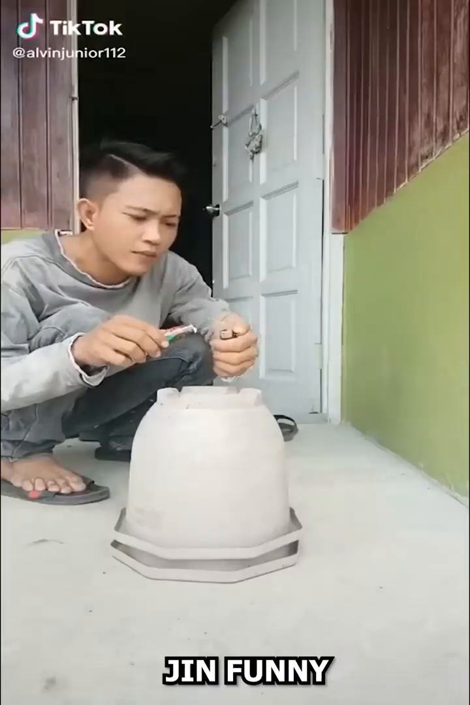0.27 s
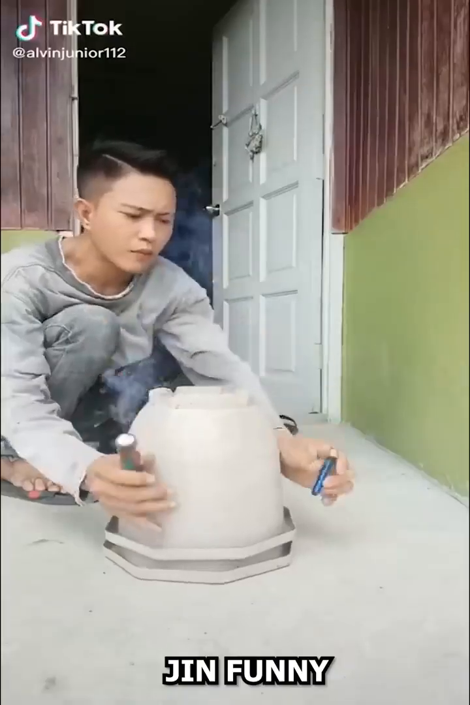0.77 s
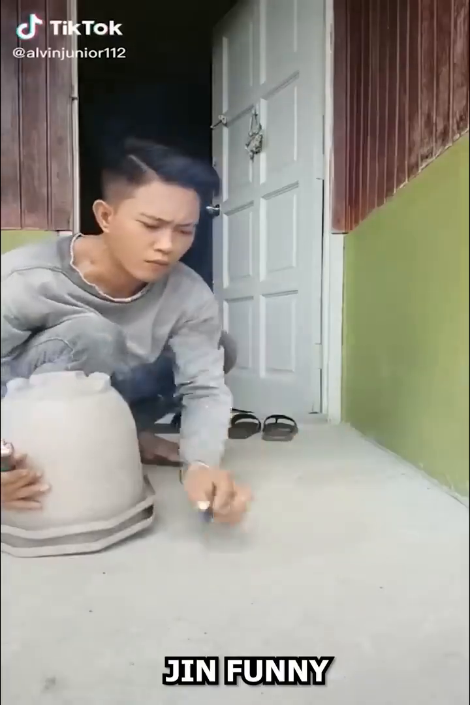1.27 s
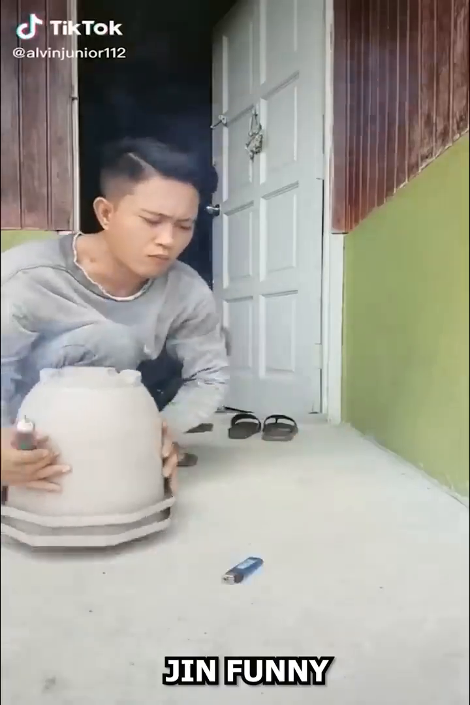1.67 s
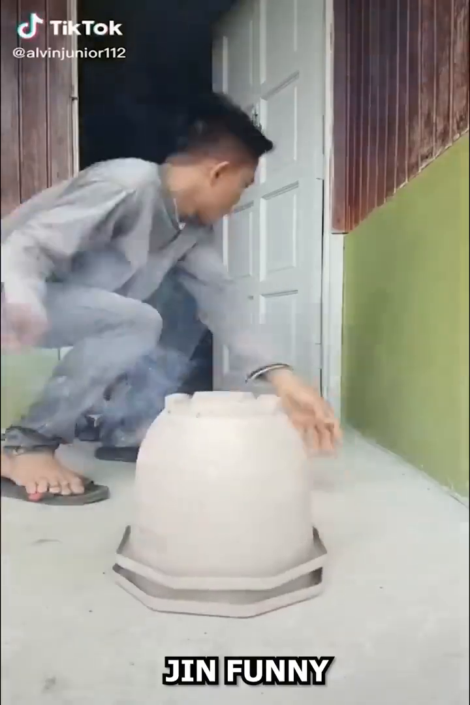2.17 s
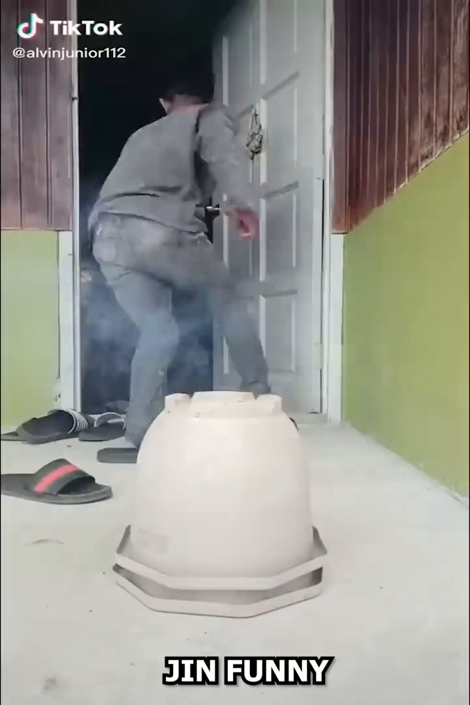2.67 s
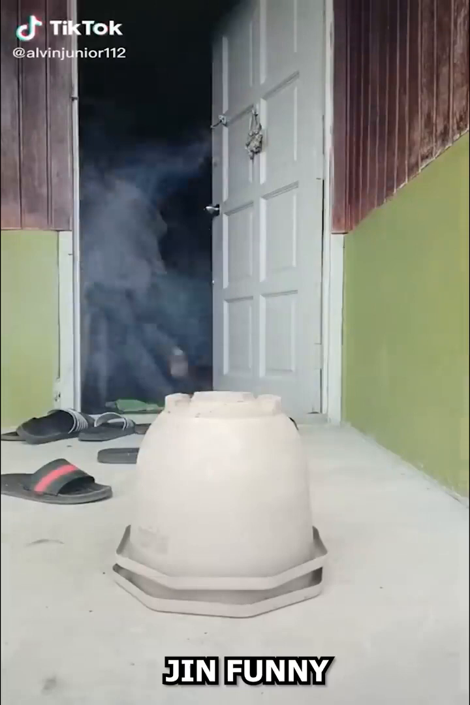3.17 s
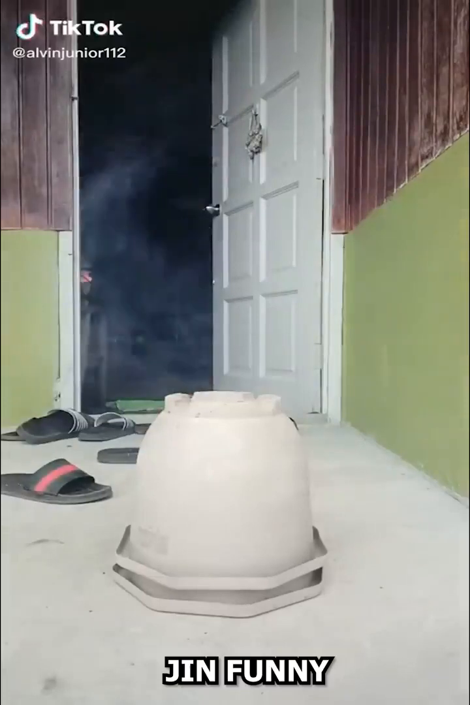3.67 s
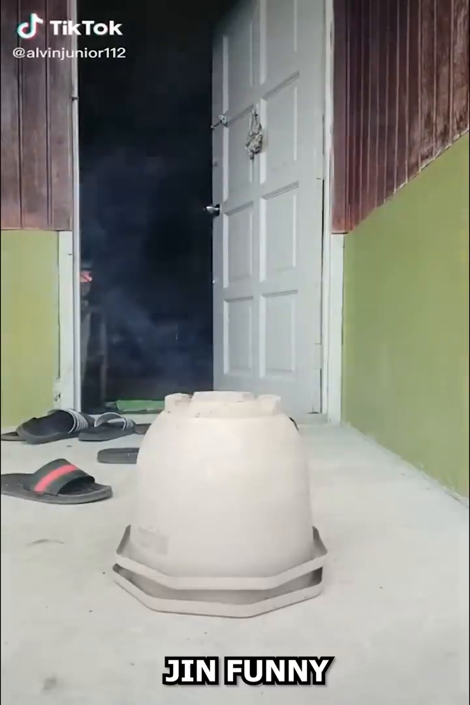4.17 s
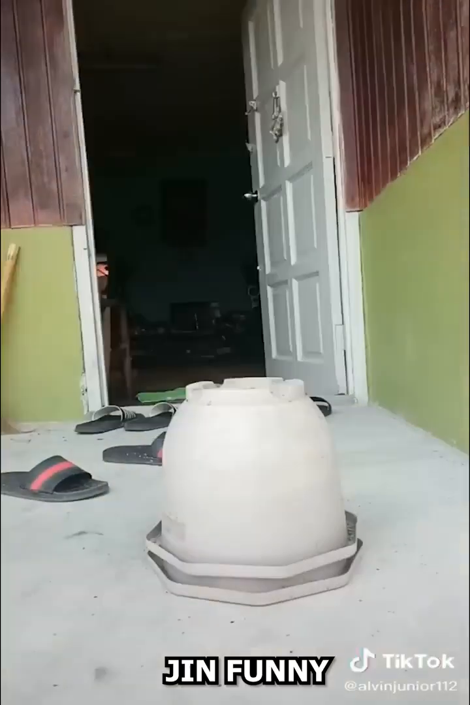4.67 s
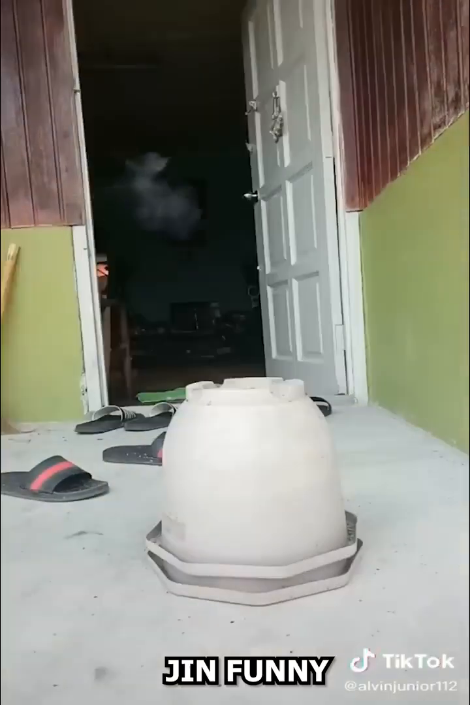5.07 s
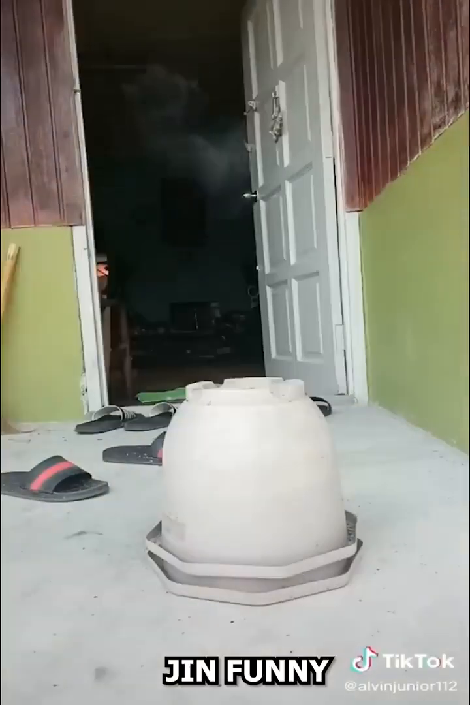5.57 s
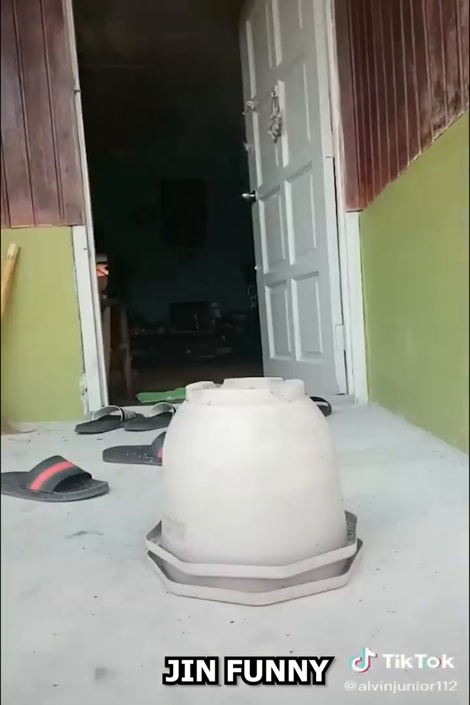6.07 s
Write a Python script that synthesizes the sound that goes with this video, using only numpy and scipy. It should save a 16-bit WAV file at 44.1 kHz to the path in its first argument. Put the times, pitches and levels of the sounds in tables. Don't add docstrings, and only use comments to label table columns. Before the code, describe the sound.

A lighter snaps, far dog barks, a hollow pot clatters onto concrete; after a hush a deafening firecracker blast rolls on, growing duller.

```python
import sys
import numpy as np
from scipy import signal
from scipy.io import wavfile
from scipy.ndimage import uniform_filter1d, minimum_filter1d

SR = 44100
rng = np.random.default_rng(int(sys.argv[2]) if len(sys.argv) > 2 else 0)


def generate_wav(signal):
    frames = np.transpose(np.atleast_2d(signal))
    scaled = np.clip(frames, -1, 1) * 32767
    pcm = np.round(scaled).astype(np.int16)
    wavfile.write(sys.argv[1], SR, pcm)


def field_ratio(decibels):
    return 10 ** (np.asarray(decibels, dtype=float) / 20)


N = 279591
TIME = np.arange(N) / SR
HZ = np.fft.rfftfreq(512, 1 / SR)[:, None]
FRAME_S = np.arange(N // 128 + 5) * 128 / SR

BANG_S = 4.699


def evened(x):
    return x / np.sqrt(np.mean(x ** 2) + 1e-20)


def spectrum(points, hz):
    f, level_db = np.transpose(points)
    return np.interp(np.log(hz + 1), np.log(f + 1), level_db)


def curve(rows, t=TIME):
    s, value = np.transpose(rows)
    return np.interp(t, s, value)


def bump(hz, octaves):
    return np.exp(-(np.log2((HZ + 1) / hz) / octaves) ** 2)


def burst(s, db, rise_db_per_s, fall_db_per_s, hold_s=0.):
    before_db = (s - TIME) * rise_db_per_s
    after_db = np.maximum(TIME - s - hold_s, 0) * fall_db_per_s
    return field_ratio(db - np.maximum(before_db, after_db))


def slow(rate_hz):
    low_pass = signal.butter(2, rate_hz, fs=SR, output="sos")
    return evened(signal.sosfilt(low_pass, rng.standard_normal(N)))


def noise(shape_db, patchy_db, flicker_db):
    a, b, patches = rng.standard_normal((len(FRAME_S), len(HZ), 3)).T
    flicker = evened(uniform_filter1d(rng.standard_normal(len(FRAME_S)), size=3))
    patches = uniform_filter1d(patches, size=5, axis=0)
    patches = evened(uniform_filter1d(patches, size=16, axis=1))
    gain = field_ratio(shape_db + 0 * a)
    gain = gain / np.sqrt((gain ** 2).sum(0))
    z = (a + 1j * b) * gain * field_ratio(patchy_db * patches + flicker_db * flicker)
    return evened(signal.istft(z, nperseg=512, noverlap=384)[1][:N])


def resonate(x, hz, width_hz):
    turn = np.exp(2j * np.pi * np.cumsum(hz * np.ones(len(x))) / SR)
    r = np.exp(-np.pi * width_hz / SR)
    for _ in range(2):
        x = 2 * (turn * signal.lfilter([1 - r], [1, -r], x / turn)).real
    return x


def ring(modes, rise_s=0.):
    t = TIME[:SR // 2]
    rise = 1 - np.exp(-t / (rise_s + 1e-9))
    return rise * sum(field_ratio(db - 60 * t / t60) * np.sin(2 * np.pi * hz * t) for hz, db, t60 in modes)


def placed(s, sound):
    return np.pad(sound, (round(s * SR), N))[:N]


def yard(x, t60, wet_db):
    t = TIME[:SR // 2]
    scattered = rng.standard_normal(len(t)) * (rng.random(len(t)) < .05)
    tail = scattered * field_ratio(-60 * t / t60) * (t > .02)
    return x + field_ratio(wet_db) * signal.oaconvolve(x, tail / np.linalg.norm(tail))[:N]


def high_pass(x, hz):
    return signal.sosfilt(signal.butter(3, hz, "high", fs=SR, output="sos"), x)


def phone():
    shelf_db = -5.5 * (HZ > 6300)
    notch_db = -3.5 * np.exp(-((HZ - 12200) / 300) ** 2)
    return shelf_db + notch_db


def holes(share):
    cells = rng.random((len(FRAME_S) // 16 + 1, len(HZ))).T
    cells = np.repeat(cells, 16, 1)[:, :len(FRAME_S)]
    return -30 * (cells < share * np.clip((HZ - 2000) / 4000, 0, 1))


def air():
    # f/Hz, level/dB per Hz
    porch = [(65, -43.5), (110, 1), (200, -17), (636, -23), (885, -21), (1110, -24.5), (1940, -25.5),
             (3750, -15), (5220, -24.5), (6160, -23.5), (7270, -30), (13000, -29), (15300, -35)]
    # t/s, level/dB
    opening = [(0.0, -54.5), (0.4, -54), (1.2, -52), (1.8, -52), (2.25, -54), (2.67, -52.5), (2.84, -57.5),
               (3.3, -59), (3.7, -57.5), (4.2, -56), (4.42, -58)]
    # f/Hz, width/Hz, level/dB
    insects = [(3350, 270, 5), (3643, 400, 12.5), (4200, 215, -7)]
    # t/s, level/dB
    swell = [(0.0, -50), (0.32, -50), (0.71, -66), (1.12, -41), (1.79, -47), (2.67, -47.5), (2.84, -50),
             (3.2, -50), (3.4, -73), (3.58, -46), (3.82, -47.5), (4.13, -53), (4.3, -51), (4.42, -67)]
    treble_db = 1.04 * (curve(opening, FRAME_S) + 53.5) * bump(5800, .4)
    colour = spectrum(porch, HZ) + phone() + treble_db + holes(0.051)
    hiss = noise(colour, patchy_db=1.5, flicker_db=.5)
    rasp = noise(0 * HZ, patchy_db=-0.5, flicker_db=2.0)
    chorus = sum(field_ratio(db) * resonate(rasp, hz, width) for hz, width, db in insects)
    return field_ratio(curve(opening) + 8.5) * hiss + field_ratio(curve(swell) - 4.0) * evened(chorus)


def engine():
    # t/s, level/dB
    throttle = [(0.0, -54), (0.08, -62), (0.64, -55), (1.04, -37.5), (1.25, -37.5), (1.32, -30.5),
                (1.79, -31), (2.08, -45.5), (2.18, -39), (2.34, -41.5), (2.56, -36), (2.8, -45.5),
                (3.3, -51.5), (3.69, -34.5), (3.82, -38), (4.05, -50.5), (4.12, -49), (4.4, -57)]
    # multiple of firing rate, level/dB
    firing_orders = [(2, -8), (3, 0.5), (4, -11), (5, -37), (6, -28.5), (7, -44), (8, -21)]
    firing_hz = 24.4
    turns = np.cumsum(firing_hz * (1 + .004 * slow(rate_hz=3))) / SR
    orders = sum(field_ratio(db + 1.4 * slow(rate_hz=3.7)) * np.cos(2 * np.pi * k * turns)
                 for k, db in firing_orders)
    rumble = evened(resonate(rng.standard_normal(N), 80, 70))
    return field_ratio(curve(throttle)) * (evened(orders) + .3 * rumble)


def cock():
    # t/s, length/s, f/Hz, level/dB
    crows = [
        (0.0, 0.2, 767, -58),
        (0.693, .095, 618, -58.5),
        (0.802, .095, 592, -58),
        (.92, 0.063, 580, -57.5),
    ]
    sag_hz_per_s, fade_db_per_s = 48, 24
    waver = np.sin(2 * np.pi * 17 * TIME)
    out = np.zeros(N)
    for s, length, hz, db in crows:
        u = np.clip(TIME - s, 0, length)
        phase = 2 * np.pi * np.cumsum(hz - sag_hz_per_s * u + 12 * waver) / SR
        on = uniform_filter1d(1. * (u > 0) * (u < length), size=900)
        voice = np.sin(phase) + field_ratio(-11) * np.sin(2 * phase)
        out += on * field_ratio(db + 7 - fade_db_per_s * u + 1.5 * waver) * voice
    return out


def lighter():
    # f/Hz, level/dB per Hz
    flick = [(59, -41), (100, -16), (275, -26), (708, -25), (803, -25), (1080, -21), (1200, -22.5),
             (2500, -22), (3730, -2), (4700, -14), (6050, -13.5), (6730, -20), (15300, -29.5)]
    # f/Hz, level/dB, t60/s
    snap = [(3650, -3, .008), (3200, -9, .008), (6000, -15, .008), (420, -28, .045), (260, -31, .08)]
    snap_s = .3683
    hiss = noise(spectrum(flick, HZ) + phone(), patchy_db=1.2, flicker_db=1.5)
    spark = burst(snap_s, -20, rise_db_per_s=1500, fall_db_per_s=2200)
    gas = burst(snap_s + .014, -27, rise_db_per_s=450, fall_db_per_s=190)
    return (spark + gas) * hiss + placed(snap_s, ring(snap, rise_s=0.00058))


def dog():
    # t/s, effort/dB, widest mouth as a factor on the throat
    barks = [
        (1.30, -36.5, 1.17),
        (1.75, -35, 1.09),
    ]
    # f/Hz, width/Hz, level/dB
    throat_modes = [(840, 560, 6.5), (1300, 860, -15), (2300, 650, -28), (400, 230, -9)]
    rise_s, hold_s, fall_s, gape_s = 0.028, 0.068, 0.035, .063
    low_hz, top_hz, end_hz = 341.5, 489, 398.3
    shut, relax = 0.54, 0.24
    length = rise_s + hold_s + fall_s
    out = np.zeros(N)
    for s, effort_db, gape in barks:
        u = TIME - s
        db = np.interp(u, [0, rise_s, length - fall_s, length], [-12, 0, -3.5, -33])
        opening = np.clip(u / gape_s, 0, 1) ** 1.5
        hz = low_hz + (top_hz - low_hz) * opening
        hz = end_hz + (hz - end_hz) * np.exp(-np.maximum(u - gape_s, 0) / 0.027)
        mouth = shut + (gape - shut) * opening
        mouth = mouth * (1 - relax * np.clip((u - gape_s) / .035, 0, 1))
        turns = np.cumsum(hz * (1 + .04 * slow(rate_hz=120))) / SR
        folds = sum(np.cos(2 * np.pi * k * turns) for k in range(1, 9))
        breath = (0.44 + np.exp(-(turns % 1) / .3)) * rng.standard_normal(N)
        drive = .36 * evened(folds) + .8 * evened(breath)
        throat = sum(field_ratio(level) * resonate(drive, f * mouth, width) for f, width, level in throat_modes)
        out += (u >= 0) * (u < length) * field_ratio(effort_db + db) * evened(throat)
    return yard(out, t60=.7, wet_db=-3)


def pot():
    # t/s, low wall level/dB, high wall level/dB, slap level/dB, pitch factor as the grip stiffens the wall
    knocks = [(2.870, -7, -3, -11.5, 1.09), (2.884, -10, -13.5, -35, 1.09), (2.906, -3, 3, -25, 1.05),
              (2.92, -9, -19, -28, 1.01), (2.935, -4.5, -16, -32, 1.01), (2.946, -9.5, -23, -38, 1.3),
              (2.998, -15, -29, -45, .98), (3.019, -15.5, -30, -48, .98), (3.052, -10.5, -18, -28, .99),
              (3.061, 4.5, -21, -29, .98), (3.087, -16, -17.5, -45, 0.92), (3.123, -27, -25, -39, .96),
              (3.157, -26, -32, -46, 1.3)]
    # f/Hz, level/dB, t60/s
    low_wall = [(201.4, -2, 0.1), (194.4, -18, 0.58)]
    high_wall = [(349, -3, 0.08), (324, -4.5, 0.13), (417, -4, 0.048)]
    slap = [(654, 8.5, 0.016), (970, -8, 0.038), (1380, -30, .04)]
    # t/s, peak level/dB, f/Hz
    ticks = [(2.8643, -26.5, 2650), (2.8623, -17.5, 2150), (2.8696, -16, 1830), (2.898, -24, 1950),
             (2.9052, -16, 1520), (2.9346, -40, 3560), (2.991, -25, 2030), (3.004, -23.5, 2400),
             (3.0184, -23, 2040), (3.0517, -23.5, 2340), (3.1072, -25.5, 1900), (3.1203, -19, 2030)]
    # t/s, peak level/dB, fade/dB per s
    skids = [(2.865, -31, 900), (2.874, -18, 1500), (2.935, -25.5, 301), (3.008, -34.5, 121),
             (3.054, -22.5, 452), (3.123, -31, 240)]
    # f/Hz, level/dB per Hz
    scrape = [(350, -38), (600, -4.5), (1280, -2.5), (1490, -11), (1980, 0), (3640, -1.5), (5530, -14),
              (6780, -21.5), (15300, -30)]
    # t/s, level/dB, f/Hz, t60/s
    landings = [
        (3.056, -36, 89, .1),
        (3.123, -18, 99, 0.11),
        (3.157, -26, 70, 0.1),
    ]
    out = np.zeros(N)
    blow = signal.windows.hann(max(round(.0015 * SR), 3))
    for s, low_db, high_db, slap_db, pitch in knocks:
        parts = [(low_db, low_wall), (high_db, high_wall), (slap_db, slap)]
        body = ring([(hz * pitch, db + part_db, t60) for part_db, modes in parts for hz, db, t60 in modes])
        out += placed(s, signal.oaconvolve(body, blow / blow.sum()))
    for s, db, hz in ticks:
        rim = [(hz, 0, .012), (hz * 1.45, -4, .01), (hz * 1.9, -6, .01), (hz * 2.6, -12, .008)]
        out += placed(s, field_ratio(db + 1.5) * ring(rim, rise_s=.0003))
    skid = sum(burst(s, db - 5.0, 1100, fade) for s, db, fade in skids)
    out += skid * noise(spectrum(scrape, HZ) + phone(), patchy_db=2.1, flicker_db=1.5)
    held = out * field_ratio(np.interp(TIME, [3.172, 3.185], [0, -10]))
    thumps = sum(placed(s, ring([(hz, db, t60)])) for s, db, hz, t60 in landings)
    return yard(high_pass(held, 130) + thumps, t60=.6, wet_db=-25)


def band_top():
    # t/s, f/Hz
    tops = [(4.4, 13060), (4.97, 13000), (5.03, 11330), (5.24, 11350), (5.29, 9560), (5.85, 9300),
            (5.9, 8370), (6.2, 8070), (6.3, 7010)]
    ragged = np.repeat(rng.uniform(-350, 100, len(FRAME_S) // 8 + 1), 8)[:len(FRAME_S)]
    top = curve(tops, FRAME_S)
    return -np.clip(HZ - top - ragged * (top < 12000), 0, 300) / 5


def still():
    # f/Hz, level/dB per Hz
    middle_air = [(24, -33.5), (40, -7), (150, -7), (298, -1.5), (2460, -21), (2640, -23), (2920, -17),
                  (12100, -34.5), (14000, -43)]
    side_air = [(24, -33.5), (40, -2), (291, -2), (856, -4), (2920, -6), (12400, -19), (14000, -38)]
    middle = noise(spectrum(middle_air, HZ) + band_top(), patchy_db=1.5, flicker_db=1.2)
    side = noise(spectrum(side_air, HZ) + band_top(), patchy_db=1.5, flicker_db=1.2)
    thud = placed(4.598, field_ratio(-28) * ring([(115, 0, .08)]))
    return np.array([field_ratio(-45) * middle + thud, field_ratio(-56) * side]) * (TIME < 4.7)


def fizz():
    # t/s, length/s, level/dB
    patches = [
        (5.165, 0.043, -60),
        (5.413, 0.14, -62),
        (5.734, 0.065, -70.5),
    ]
    level = sum(burst(s, db, 850, 850, hold_s=length) for s, length, db in patches)
    band_db = -60 * ((HZ < 9000) | (HZ > 14800)) - HZ / 800
    return level * noise(band_db + holes(.45), patchy_db=5, flicker_db=2.1)


def blast():
    # f/Hz, level/dB per Hz
    near_middle = [(18, -53), (30, -22), (223, -4), (466, -13), (516, -10), (1130, -16.5), (1220, -14),
                   (2250, -19), (2560, -18), (11400, -25), (13000, -27.5)]
    far_middle = [(18, -41.5), (30, -15), (76, 4.5), (195, -15), (309, 1), (514, -2), (577, -3.5),
                  (798, -2.5), (2980, -30.5), (5680, -51), (7500, -65.5), (9750, -75.5), (16500, -120)]
    near_side = [(35, -29), (60, -4.5), (165, 1), (303, -32), (416, -6), (1960, -18), (9280, -11),
                 (13000, -15.5)]
    far_side = [(350, -106), (600, -74), (841, -60.5), (1050, -20.5), (1110, -22), (1330, -11.5),
                (2990, -6.5), (7500, -27.5), (9750, -40.5), (16500, -120)]
    # t/s, lift/dB, deep rumble level/dB
    rolls = [(5.01, 2.5, -1), (5.09, 2.5, 2), (5.17, 3, 6), (5.24, 2, 1), (5.39, 3, 2), (5.45, 2, 3),
             (5.535, 3.5, 3), (5.66, 2, 0), (5.73, 3, -3.5), (5.82, 2, 1), (5.9, 2, 1.5), (6.07, 1.5, 0),
             (6.19, 2, 1), (6.31, 2, 7)]
    # t/s, peak level/dB, length/ms
    claps = [(4.702, -3, 1.3), (4.712, -3, 1.9), (4.787, -5, 1.1), (4.896, -2, .6), (4.903, -3, .7),
             (5.003, -4, .9), (5.15, -4, 1.1)]
    # t/s, level/dB, fade/dB per s
    booms = [
        (4.71, -11, 230),
        (4.8, -12.5, 133),
        (4.92, -22, 220),
    ]
    age = np.maximum(FRAME_S - BANG_S, 0)
    far = 0.91 * (1 - np.exp(-age / 0.56)) - .13 * np.exp(-((FRAME_S - 4.95) / .04) ** 2)

    lift_db, deep_db = sum(np.outer([lift, deep], np.exp(-((FRAME_S - s) / .035) ** 2))
                           for s, lift, deep in rolls)
    full_db = 8 * np.exp(-age / 0.065) - 8 * np.exp(-((age - 0.19) / 0.084) ** 2)
    full_db = full_db - 3 + 1.6 * lift_db
    deep_db = deep_db - 1.5 + 11 * np.exp(-((age - .06) / 0.11) ** 2)

    colour = (1 - far) * spectrum(near_middle, HZ) + far * spectrum(far_middle, HZ)
    colour = colour + full_db * bump(400, 0.64) + deep_db * bump(90, .6)
    roar = noise(colour + band_top() + holes(.5 * far), patchy_db=1.66, flicker_db=1.0)
    colour = (1 - far) * spectrum(near_side, HZ) + far * spectrum(far_side, HZ)
    wide = noise(colour + band_top() + holes(.3 * far), patchy_db=2.1, flicker_db=1.8)

    roar_db = -9.5 - 1.0 - 7.5 * np.exp(-age / .17) - 0.55 * age + lift_db
    onset = burst(BANG_S, 0, rise_db_per_s=1400, fall_db_per_s=0)
    level = onset * field_ratio(np.interp(TIME, FRAME_S, roar_db))
    level = level + burst(BANG_S, -11 - 3, rise_db_per_s=1400, fall_db_per_s=600)
    level = level + sum(burst(s, db - 17, 4000, 900) for s, db, _ in claps)

    boom_hz = 70 + (286 - 70) * np.exp(-np.maximum(TIME - BANG_S, 0) / 0.15)
    boom = evened(resonate(rng.standard_normal(N), boom_hz, 98))
    booming = onset * sum(burst(s, db, 500, fade) for s, db, fade in booms)
    middle = level * roar + booming * boom + fizz()
    for s, peak_db, length_ms in claps:
        u = TIME[:2000] * 1000 / length_ms
        step = (1 - u) * np.exp(-u) * (1 - np.exp(-(u / .35) ** 2))
        middle -= placed(s, field_ratio(peak_db + 4) * step)

    side_db = -41 + 25 * np.exp(-age / 0.27)
    spread = onset * burst(BANG_S + 0.027, 0, 220, 0) * field_ratio(np.interp(TIME, FRAME_S, side_db))
    return np.array([high_pass(middle, 55), spread * wide])


def scene():
    porch_end_s, wide_start_s = 4.412, 4.436
    porch = air() + engine() + cock() + lighter() + dog() + pot()
    porch = porch * np.clip((porch_end_s - TIME) / 0.0041, .15, 1)
    middle, side = (still() + blast()) * np.clip((TIME - wide_start_s) / 0.0018, 0, 1)
    return porch * (TIME < wide_start_s) + np.array([middle + side, middle - side])


def top_cut(x):
    return signal.sosfilt(signal.butter(12, 15430, fs=SR, output="sos"), x)


def record(dry):
    peak = -minimum_filter1d(-abs(dry).max(0), size=181)
    held = np.minimum(.985 / (peak + 1e-9), 1)
    gain = uniform_filter1d(uniform_filter1d(held, size=90), size=90)
    gain = gain * np.clip((TIME[-1] - TIME) / .0004, .45, 1)
    return top_cut(np.clip(dry * gain, -1, 1))


dry = scene()
out = record(dry)
generate_wav(out)
```